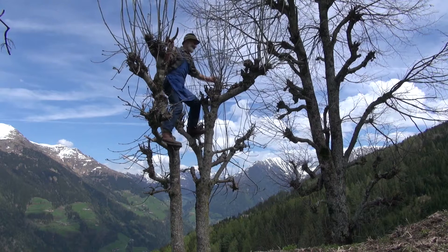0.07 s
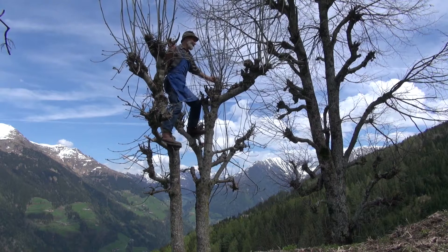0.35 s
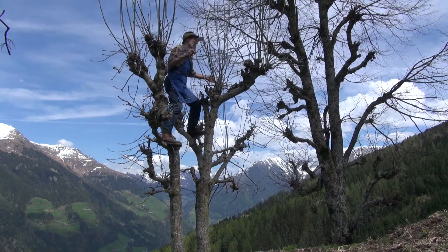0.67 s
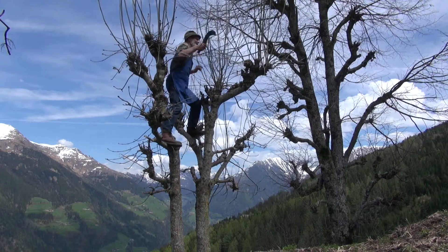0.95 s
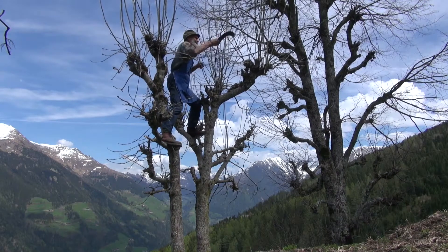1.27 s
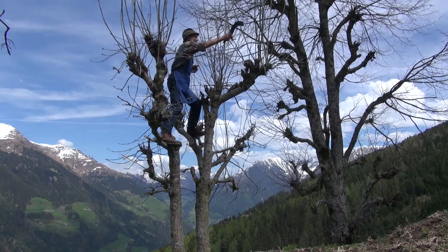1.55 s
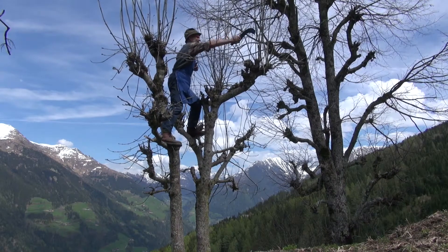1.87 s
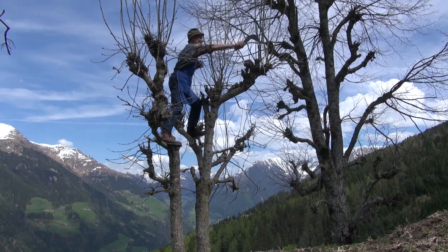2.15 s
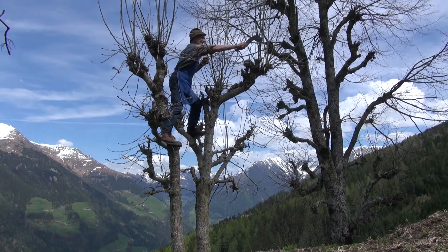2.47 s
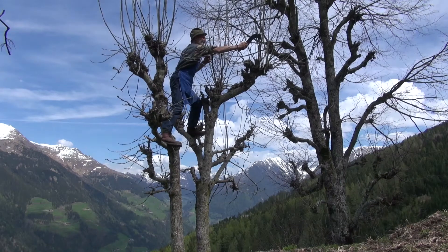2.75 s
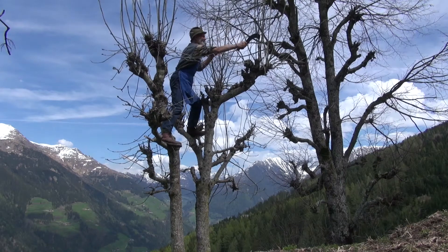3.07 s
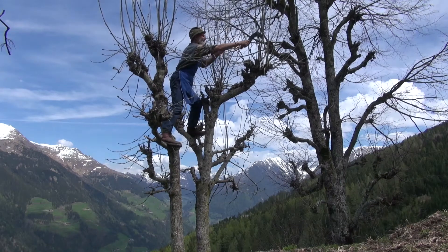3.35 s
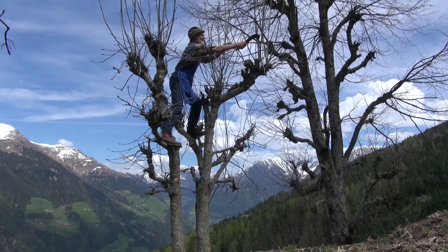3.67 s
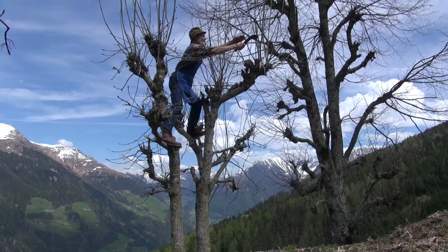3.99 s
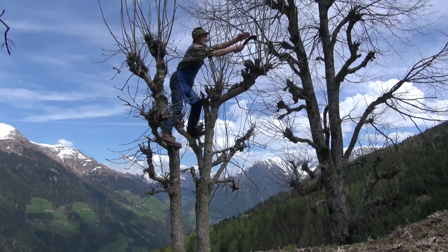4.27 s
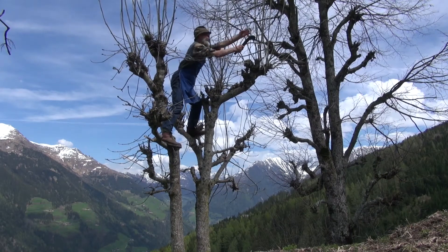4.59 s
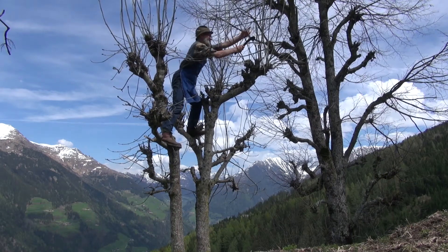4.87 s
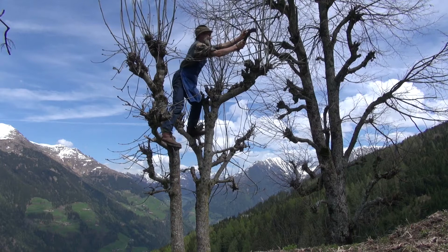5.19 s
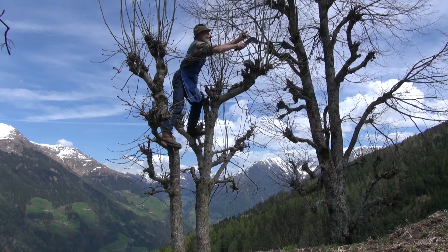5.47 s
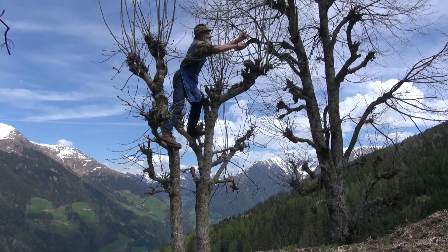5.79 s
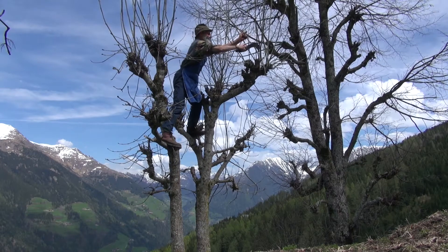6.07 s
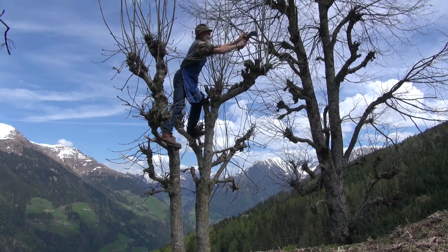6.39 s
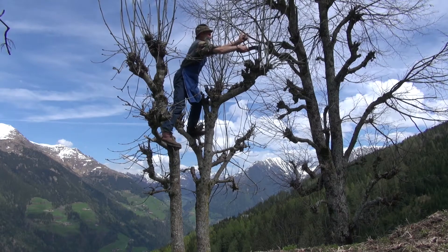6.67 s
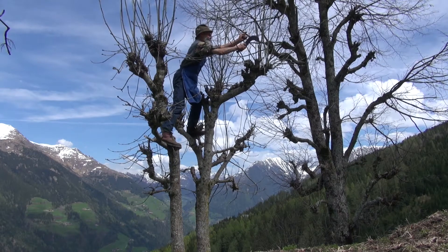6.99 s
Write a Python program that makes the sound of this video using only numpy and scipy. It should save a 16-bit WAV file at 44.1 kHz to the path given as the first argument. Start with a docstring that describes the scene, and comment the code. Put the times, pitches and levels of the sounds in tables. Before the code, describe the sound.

Bare branches rustle and click during pruning, then a dry stick cracks sharply, over a faint valley rush and distant birds.

```python
"""Twigs rustle and tick close by as bare trees are pruned on a mountain meadow: bark slips on bark.
A few metres off, branches knock together and the steel shears ring once; something squeaks up and
slides down. Near the end dry sticks snap, fibre bundle by fibre bundle, and a freed twig swishes away.
Behind lie the rush of the valley and a few faint birds; the open ground returns only a thin echo."""
import sys
import numpy as np
from scipy import signal
from scipy.fft import rfft, irfft, next_fast_len
from scipy.io import wavfile
from scipy.ndimage import uniform_filter1d

SR = 44100
rng = np.random.default_rng(int(sys.argv[2]) if len(sys.argv) > 2 else 0)


def dump_mix(stems):
    """Bounce the given channels to the path in sys.argv[1] as a 16-bit WAV at rate SR."""
    frames = np.atleast_2d(stems).T  # one column per channel
    limited = np.clip(frames, -1, 1)  # hard clip at full scale
    pcm = np.round(limited * 32767).astype(np.int16)
    wavfile.write(sys.argv[1], SR, pcm)


N = 314874
T = np.arange(N) / SR


# Bending modes of a dry stick: f/Hz, width/Hz, level/dB
STICK_MODES = [(2880, 75, -13), (3780, 400, -4.5), (4280, 200, 0), (4880, 160, -19), (5500, 120, -5),
               (6500, 490, -2.5), (8750, 810, -5), (10000, 350, -8), (11400, 280, -11)]
def wood_ring(x, modes=STICK_MODES):
    """Bending resonances of dry wood, driven by x."""
    return sum(undb(db) * signal.lfilter(*signal.iirpeak(hz, hz / width_hz, fs=SR), x)
               for hz, width_hz, db in modes)


# Low modes of the thick stem behind the break: f/Hz, width/Hz, level/dB
STEM_MODES = [(330, 66, -2.5), (640, 50, -1.5), (1233, 45, 5)]
# Bare crack spectrum: f/Hz, level/dB
CRACK_SPECTRUM = [(80, -55), (250, 7.5), (600, -12.5), (1200, -4), (2000, 3), (2900, 3), (3700, -2),
                  (4800, 0), (7200, -1), (9000, -2), (12000, 2), (16000, -7)]
# Bark, outer fibres, core, last splinters: offset/break time, relative level/dB, decay/break time
FIBRES = [(-.45, -13, 0.74), (0, 0, 1.6), (.6, -1, .12), (0.971, -3.5, 1.6)]
# Breaking sticks: t/s, level/dB, break time/s, tilt/(dB/oct), splinter f/Hz
SNAPS = [(6.1588, -30, 0.0036, -4.5, 8700), (6.1704, -31.5, 0.0011, 0.5, 7000),
         (6.1769, -27, 0.0021, -2, 8600), (6.6684, -16.5, .0028, 1.5, 4820),
         (7.1302, -33.5, 0.0027, -0.5, 3140)]
def snaps(splinter_db=13, ring_db=7, shudder_db=-30, stem_db=-23):
    """Each bundle of fibres parts with a spike and a short tearing burst, which rings the stick."""
    out = np.zeros(N)
    for start_s, snap_db, break_s, tilt_db_per_oct, splinter_hz in SNAPS:
        for offset, fibre_db, decay in FIBRES:
            at_s, db = start_s + offset * break_s, snap_db + fibre_db
            tear = 0.159 * burst(decay * break_s)
            tear[0] = 1  # the spike
            splinter = undb(splinter_db) * band(tear, splinter_hz, 1.06, order=1)
            ring = undb(ring_db) * wood_ring(tear)
            crack = colour(tear + splinter + ring, CRACK_SPECTRUM, tilt_db_per_oct)
            add(out, at_s, hit(crack, db))
            # the thick stem shudders on, and grows less with the force
            shudder = band(burst(decay_s=0.012), hz=560, ratio=1.77)
            add(out, at_s, hit(shudder, 0.58 * db + shudder_db))
        stem_ring = wood_ring(signal.unit_impulse(SR // 8), STEM_MODES)
        add(out, start_s, hit(stem_ring, 0.53 * snap_db + stem_db))
    return out


# Pushes and pulls: peak t/s, level/dB, rise/s, fall/s, thin-tip share/0-1, grain size spread/dB
DRAGS = [(.03, -59, 0.073, 0.043, 1, 2), (.2, -49, 0.11, 0.15, 1, 0), (.62, -49.5, 0.091, 0.086, 0, 7),
         (.85, -63, 0.4, 0.15, 1, -2), (4.66, -51, 0.12, 0.17, 0.66, 4), (5.01, -53.5, 0.18, 0.26, 1, 5),
         (5.22, -61.5, 0.1, 0.32, 0, 3), (5.6, -55, 0.27, 0.17, 0.5, 7), (5.695, -53.5, 0.048, 0.025, 0, 8),
         (5.815, -53, 0.031, 0.073, 0.2, 12.5), (6.1, -57, 0.44, 0.38, 0.43, 11.5),
         (6.56, -47.5, 0.12, 0.11, 0.98, 2), (6.992, -62.5, 0.079, 0.076, 0.8, -8)]
def drags(rest_db=-75.5):
    """Brushwood dragged over itself: gain, then thin-tip share and grain spread weighted by power."""
    power = np.array([(undb(db) * swell(at_s, rise_s, fall_s)) ** 2
                      for at_s, db, rise_s, fall_s, _, _ in DRAGS]) + 1e-18
    total = power.sum(axis=0)
    thin_share, spread_db = np.array(DRAGS)[:, -2:].T @ power / total
    gain = np.sqrt(total + undb(rest_db) ** 2)  # the crown never quite comes to rest
    return gain, thin_share, spread_db


# Brushwood spectrum: f/Hz, level/dB
BRUSH_SPECTRUM = [(600, -17.5), (1400, 4), (2000, 1), (2750, -5), (3500, -1.5), (4700, 0), (6300, 0.5),
                  (7300, -1), (9000, 0), (11500, -4), (14000, -11), (16000, -16)]
def rustle(grains_per_s=1700, scratch_s=0.00051, hiss_db=-3, flutter_db=2, ring_db=-6, clump_db=1.5):
    """Thousands of tiny slips of bark on bark, a few much larger than the rest."""
    gain, thin_share, spread_db = drags()
    sizes = undb(spread_db * np.minimum(rng.exponential(size=N), 2.8))
    onsets = (rng.random(N) < grains_per_s / SR) * sizes
    grains = signal.fftconvolve(onsets, np.exp(-T[:256] / scratch_s))[:N] * rng.standard_normal(N)
    grains /= np.sqrt(uniform_filter1d(grains ** 2, SR // 8) + 1e-9)
    slips = grains + undb(hiss_db + flutter_db * wander(45)) * rng.standard_normal(N)
    slips += undb(ring_db) * wood_ring(slips)
    slips *= undb(clump_db * wander(110))  # twigs catch and let go
    thin_share = np.clip(thin_share + 0.15 * wander(25), 0, 1)
    stems = unit(colour(slips, BRUSH_SPECTRUM))
    tips = unit(colour(slips, BRUSH_SPECTRUM, tilt_db_per_oct=4.5))
    return gain * ((1 - thin_share) * stems + thin_share * tips)


# Thin twig contacts: t/s, level before lift/dB, centre f/Hz
TICKS = [(0.166, -36, 9900), (.225, -44, 9000), (0.284, -39, 9100), (0.6056, -39, 5300),
         (0.6142, -38, 5470), (0.6687, -35, 4960), (.884, -49.5, 9500), (1.369, -43, 7500),
         (1.947, -57, 9500), (2.041, -52, 7540), (3.98, -57.5, 7300), (4.2928, -52.5, 6900),
         (4.3427, -42, 5250), (4.3937, -51.5, 7500), (4.4613, -40.5, 5800), (4.4737, -53, 7500),
         (4.563, -45.5, 7260), (4.607, -41.5, 7600), (4.973, -47, 9200), (5.03, -45.5, 7470),
         (5.129, -44, 8500), (5.227, -50, 8500), (5.294, -49, 4000), (5.4842, -43.5, 7300),
         (5.719, -48, 8400), (5.793, -43.5, 7360), (5.8701, -45.5, 6900), (5.931, -48, 10000),
         (5.9527, -38.5, 6460), (5.998, -37.5, 6450), (6.08, -43, 5970), (6.09, -45, 5300),
         (6.978, -47, 8150)]
def ticks(rise_s=0.00022, decay_s=0.00055, ring_db=-9, lift_db=1):
    """Tiny bright contacts between twigs, each with a slightly softened attack."""
    out = np.zeros(N)
    for at_s, db, hz in TICKS:
        touch = burst(decay_s) * attack(rise_s)
        tick = band(touch + undb(ring_db) * wood_ring(touch), hz, 1.53)
        add(out, at_s, hit(tick, db + lift_db))
    return out


# Thicker branches colliding: t/s, level/dB, centre f/Hz, decay/s
KNOCKS = [(.646, -38, 3800, 0.0042), (.668, -33, 1850, 0.0056), (.76, -47, 2000, 0.0083),
          (0.912, -41, 1430, 0.0051), (1.0545, -39.5, 1710, 0.0087), (1.422, -43.5, 2695, 0.0046),
          (1.428, -37.5, 1650, 0.0064), (1.477, -45, 2080, 0.0029), (1.5781, -41, 1330, 0.016),
          (1.597, -41, 1680, 0.0032), (1.666, -45.5, 1390, 0.0067), (1.981, -44.5, 1900, 0.0041),
          (2.093, -47, 1500, .005), (2.134, -46, 2010, 0.0028), (2.311, -45, 1870, 0.0041),
          (3.128, -43, 620, 0.011), (4.752, -43.5, 1580, 0.003), (4.82, -38, 640, 0.032),
          (4.954, -48, 2000, .005), (6.9234, -42.5, 2490, 0.0014), (6.957, -45.5, 4630, 0.003),
          (6.992, -42.5, 3660, 0.0047), (7.0144, -44, 2180, 0.0035)]
def knocks(cracks_per_s=1500, rise_s=0.00079, scrape_db=-13):
    """Each knock is a run of tiny cracks with a soft attack and a wider, fainter band of scraping."""
    out = np.zeros(N)
    for at_s, db, hz, decay_s in KNOCKS:
        cracks = 0.6 + 2 * (rng.random(4096) < cracks_per_s / SR)
        push = cracks * burst(decay_s) * attack(rise_s)
        scrape = undb(scrape_db) * band(push, hz, 4.7)
        add(out, at_s, hit(band(push, hz, 1.72) + scrape, db))
    return out


def thud(at_s=3.1323, push_s=0.00034, peak_db=-39):
    """A padded blow pushes the air out and back once, with no ring."""
    u = (T - at_s) / push_s
    return -undb(peak_db) * u * np.exp((1 - u ** 2) / 2)


# Bumped stems and the clack of the shears: t/s, f/Hz, level/dB, decay/s
SHORT_RINGS = [(0.646, 1674, -42, 0.0093), (.647, 6200, -39, 0.0065), (.669, 903, -49.5, 0.015),
               (1.055, 1215, -43.5, 0.0085), (3.126, 417, -48, 0.015), (3.941, 476, -49.5, 0.025),
               (4.564, 337, -38, 0.0053), (4.821, 259, -42.5, 0.03)]
def short_rings():
    """Each bump or clack rings one damped, slightly unsteady mode."""
    out, t = np.zeros(N), T[:SR // 4]
    drift_rad = wander(150)
    for at_s, hz, db, decay_s in SHORT_RINGS:
        phase = 2 * np.pi * hz * t + drift_rad[int(at_s * SR):][:len(t)]
        envelope = attack(2 / hz, len(t)) * np.exp(-t / decay_s)
        add(out, at_s, undb(db) * envelope * np.sin(phase))
    return out


# Spells of stray contacts: start/s, end/s, count, level/dB, centre f/Hz
STRAY_SPELLS = [(0.718, 1.758, 20, -49.5, 1380), (0.751, 1.745, 14, -56.5, 6030)]
def stray_twigs(decay_cycles=6.6, scatter_db=4, scatter_oct=0.5):
    """Twigs swinging back touch at random; the thick, low ones sound longer."""
    out = np.zeros(N)
    for start_s, end_s, count, db, hz in STRAY_SPELLS:
        for place, size, pitch in rng.uniform(-1, 1, (count, 3)):
            at_s = (start_s + end_s + place * (end_s - start_s)) / 2
            touch = band(burst(decay_cycles / hz), hz * 2 ** (scatter_oct * pitch), 2)
            add(out, at_s, hit(touch, db + scatter_db * size))
    return out


# Blade modes: f/Hz, relative level/dB, t60/s
BLADE_MODES = [(2830, -10, 0.36), (3430, 2, 0.44), (4460, -10, 0.51)]
def shears(at_s=1.056, level_db=-58.5, detune=0.0017):
    """Two steel blades ring on after closing, unsteady and slightly out of tune."""
    out, t = np.zeros(N), T[:SR // 2]
    for pitch, gain in ((1, 1), (1 + detune, 0.5)):
        for hz, db, t60_s in BLADE_MODES:
            phase = 2 * np.pi * hz * pitch * t + 0.5 * wander(200)[:len(t)]
            add(out, at_s, gain * undb(level_db + db - 60 * t / t60_s) * np.sin(phase))
    return out


SLIP_S, SLIP_HZ = 2.607, 922  # top of the squeak
# Squeak harmonics from the fundamental up: level/dB
SQUEAK_HARMONICS = [0.5, -0.5, -3.5, -11.5]
def squeak_climb(start_s=2.36, start_hz=440, level_db=-54.5, rise_s=0.08, fade_s=0.044, rub_db=-14):
    """A rough tone with rubbing noise climbs as strain grows; uneven cycles blur its harmonics."""
    climb = np.clip((T - start_s) / (SLIP_S - start_s), 0, 1)
    hz = start_hz * (SLIP_HZ / start_hz) ** climb
    roughness = 1 - 0.49 * climb
    phase = phase_of(hz * (1 + 0.0597 * roughness * wander(250)))
    tone = np.zeros(N)
    for k, db in enumerate(SQUEAK_HARMONICS):
        flicker = 1 + roughness * wander(400)
        tone += undb(db) * flicker * np.sin((k + 1) * phase + 0.5 * k * wander(130))
    rubbing = undb(rub_db) * swept_noise(2.66 * hz, width_oct=1.2)
    onset = np.clip((T - start_s) / rise_s, 0, 1) ** 2
    fade = np.exp(-(np.maximum(T - SLIP_S, 0) / fade_s) ** 2)
    return undb(level_db) * onset * fade * (unit(tone) + rubbing)


def squeak_release(end_hz=189.7, body_hz=650, level_db=-45, rise_s=0.006, fall_s=0.046):
    """The squeak lets go: a tone dives, its harmonics sink through one broad resonance, it ends rough."""
    hz = dive(SLIP_S, SLIP_HZ, end_hz, oct_per_s=40)
    phase = phase_of(hz * (1 + 0.093 * end_hz / hz * wander(400)))
    harmonics = np.arange(1, 9)[:, None]
    gains = bell(harmonics * hz, body_hz, width_oct=0.69)
    partials = gains * np.sin(harmonics * phase + rng.uniform(0, 2 * np.pi, harmonics.shape))
    tone = partials.sum(axis=0) / np.sqrt((gains ** 2).sum(axis=0) / 2)
    return undb(level_db) * tone * swell(SLIP_S + rise_s, rise_s, fall_s)


def twig_swish(at_s=6.706, gain_db=-55):
    """Air noise round a freed twig, lower as it slows."""
    hz = dive(at_s, start_hz=6170, end_hz=404, oct_per_s=130)
    return undb(gain_db) * swept_noise(hz, width_oct=0.85) * swell(at_s, rise_s=0.016, fall_s=0.032)


# Far chirps: t/s, length/s, start f/Hz, end f/Hz, level/dB
CHIRPS = [(1.772, 0.18, 5680, 4980, -73.5), (2.0, 0.14, 3650, 3820, -74), (2.823, 0.035, 3250, 2820, -69),
          (2.963, 0.037, 3250, 2700, -68), (3.128, 0.14, 4880, 5470, -73), (3.253, 0.051, 3150, 2620, -69),
          (3.65, 0.13, 4770, 5450, -74)]
def birds():
    """Thin whistled glides from far away, made uneven by moving air."""
    out = np.zeros(N)
    drift = 1 + 0.003 * wander(120)
    flutter = undb(2 * wander(70))
    for at_s, length_s, start_hz, end_hz, db in CHIRPS:
        first, size = int(at_s * SR), int(length_s * SR)
        hz = np.linspace(start_hz, end_hz, size) * drift[first:first + size]
        envelope = np.sqrt(np.hanning(size)) * flutter[first:first + size]
        add(out, at_s, undb(db) * envelope * np.sin(phase_of(hz)))
    return out


# Spectrum of the valley's rush: f/Hz, level/dB
VALLEY_SPECTRUM = [(15, -60), (25, -31), (123, -3.5), (335, -2), (591, -4.5), (1070, -9.5), (2410, -17.5),
                   (2760, -21.5), (3250, -22), (4250, -22), (4610, -25.5), (5000, -27), (5730, -27),
                   (16000, -28)]
# Two gusts, then a brief low rush after the first snaps:
# peak t/s, half length/s, added mid lift/dB, rumble level/dB
BACKGROUND_SWELLS = [(1.35, 1.6, 4.5, -90), (5.11, 0.4, 1.5, -71), (6.22, 0.065, 7.5, -69.5)]
def valley(rush_db=-60.5, calm_lift_db=2, calm_rumble_db=-85):
    """A distant rush over a faint wind rumble; each swell lifts the mids and the rumble."""
    rush = undb(rush_db) * unit(colour(rng.standard_normal(N), VALLEY_SPECTRUM))
    mids = band(rush, hz=1260, ratio=1.81, order=1)
    mid_db, rumble_gain = calm_lift_db, undb(calm_rumble_db)
    for at_s, half_s, lift_db, rumble_db in BACKGROUND_SWELLS:
        envelope = swell(at_s, half_s, half_s)
        mid_db += lift_db * envelope
        rumble_gain = np.hypot(rumble_gain, undb(rumble_db) * envelope)
    rumble = unit(band(rng.standard_normal(N), hz=60, ratio=1.58)) * undb(2 * wander(22.05))
    return rush + mids * (undb(mid_db) - 1) + rumble_gain * rumble


def near_reflection(x, mean_lag_s=0.000701, echo_db=-8.5, cutoff_hz=6860):
    """A close surface returns a dull, inverted copy; its notches shift as the brushwood moves."""
    lag_s = mean_lag_s * (1 + 0.018 * wander(2.88))
    dull = signal.sosfilt(signal.butter(1, cutoff_hz, fs=SR, output="sos"), x)
    return x - undb(echo_db) * np.interp(T - lag_s, T, dull, left=0)


def meadow_echo(x, wet_db, t60_s):
    """Scatter from trunks and ground adds a thin, dull tail."""
    t = T[:SR // 2]
    tail = rng.standard_normal(len(t)) * undb(-60 * t / t60_s) * attack(0.00048, len(t))
    tail = colour(tail, [(200, 2), (1300, 11), (6000, -6), (15000, -8.5)])
    return x + undb(wet_db) * signal.fftconvolve(x, tail / np.sqrt(np.sum(tail ** 2)))[:N]


def undb(db):
    """Decibels to gain."""
    return 10 ** (np.asarray(db) / 20)


def unit(x):
    """Scale to rms 1."""
    return x / np.sqrt(np.mean(x ** 2))


def hit(x, db):
    """Scale to the energy of 1 ms at this level."""
    return undb(db) * x / np.sqrt(np.sum(x ** 2) * 1000 / SR)


def add(out, at_s, x):
    """Mix x into out from at_s."""
    first = int(at_s * SR)
    out[first:first + len(x)] += x[:N - first]


def colour(x, points, tilt_db_per_oct=0):
    """Minimum-phase filter through (f/Hz, level/dB) points, tilted above 1024 Hz."""
    size = next_fast_len(len(x) // 2 + 1) * 2
    octave = np.log2(np.maximum(np.fft.rfftfreq(size, 1 / SR), 1))
    hz, db = np.transpose(points)
    db = np.interp(octave, np.log2(hz), db) + tilt_db_per_oct * np.maximum(octave - 10, 0)
    cepstrum = irfft(np.log(undb(db)))
    cepstrum[1:size // 2] *= 2
    cepstrum[size // 2 + 1:] = 0
    return irfft(rfft(x, size) * np.exp(rfft(cepstrum)))[:len(x)]


def band(x, hz, ratio, order=2):
    """Band-pass from hz / ratio to hz * ratio, capped below Nyquist."""
    edges_hz = [hz / ratio, min(hz * ratio, 0.45 * SR)]
    return signal.sosfilt(signal.butter(order, edges_hz, "band", fs=SR, output="sos"), x)


def bell(hz, centre_hz, width_oct):
    """Gaussian weight over log frequency."""
    return np.exp(-0.5 * (np.log2(hz / centre_hz) / width_oct) ** 2)


def swept_noise(centre_hz, width_oct):
    """Noise in a band that follows centre_hz."""
    return sum(unit(band(rng.standard_normal(N), hz, 1.3)) * bell(hz, centre_hz, width_oct)
               for hz in 250 * 2 ** np.arange(0, 6, 2 / 3))


def burst(decay_s, size=4096):
    """Decaying noise: one contact or tear."""
    return rng.standard_normal(size) * np.exp(-T[:size] / decay_s)


def attack(rise_s, size=4096):
    """Exponential rise from 0 to 1."""
    return 1 - np.exp(-T[:size] / rise_s)


def swell(peak_s, rise_s, fall_s, roundness=1.66):
    """Envelope that reaches 1 at peak_s and dies away."""
    return np.exp(-np.abs((T - peak_s) / np.where(T < peak_s, rise_s, fall_s)) ** roundness)


def dive(at_s, start_hz, end_hz, oct_per_s):
    """Frequency that holds until at_s, then falls to end_hz."""
    return np.maximum(start_hz * 2 ** (-oct_per_s * np.maximum(T - at_s, 0)), end_hz)


def phase_of(hz):
    """Running phase in radians."""
    return 2 * np.pi * np.cumsum(hz) / SR


def wander(rate_hz):
    """Smooth random curve, rms 1."""
    hold = int(SR / rate_hz)
    steps = np.repeat(rng.standard_normal(N // hold + 1), hold)
    return unit(uniform_filter1d(uniform_filter1d(steps, hold), hold)[:N])


def scene():
    """The snaps are almost dry; brushwood and farther sources carry louder, shorter echoes."""
    sticks = meadow_echo(snaps(), wet_db=-20, t60_s=0.3)
    brushwood = near_reflection(ticks() + rustle()) + twig_swish()
    near = meadow_echo(brushwood, wet_db=-17.5, t60_s=0.04)
    impacts = knocks() + thud() + stray_twigs() + short_rings()
    far = impacts + shears() + squeak_climb() + squeak_release() + birds()
    return (sticks + near + meadow_echo(far, wet_db=-14.5, t60_s=0.07) + valley())[None]


def record(dry):
    """Steep low-pass at 15.7 kHz."""
    return signal.sosfilt(signal.ellip(10, 0.2, 70, 15700, fs=SR, output="sos"), dry)


dry = scene()
out = record(dry)
dump_mix(out)
```